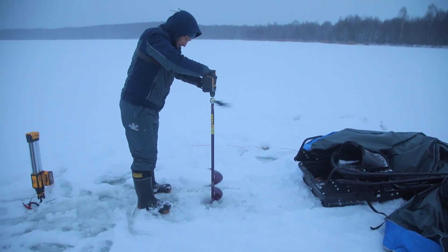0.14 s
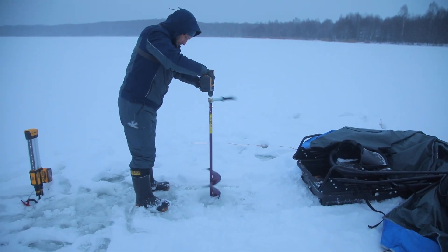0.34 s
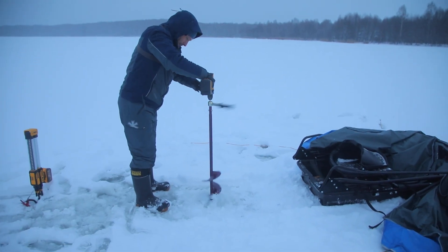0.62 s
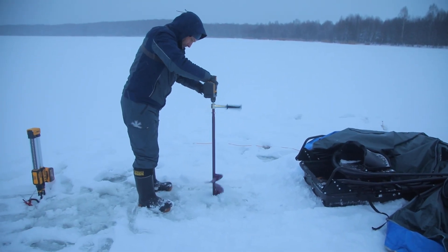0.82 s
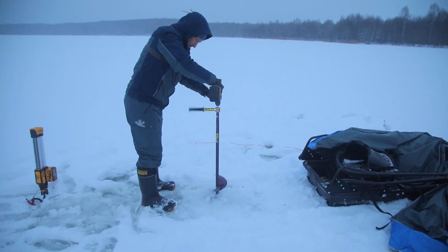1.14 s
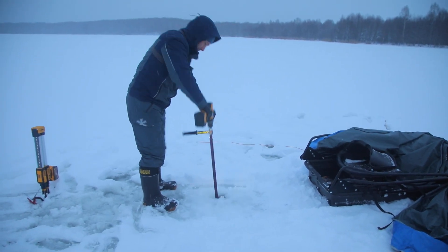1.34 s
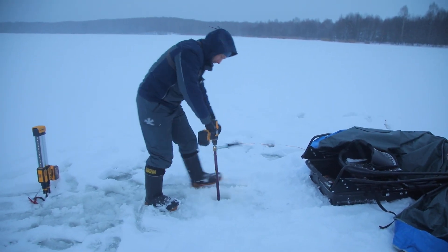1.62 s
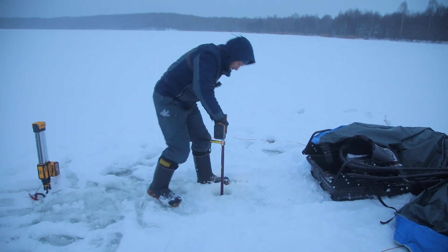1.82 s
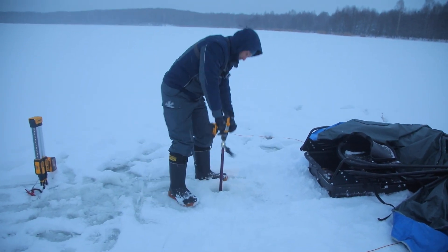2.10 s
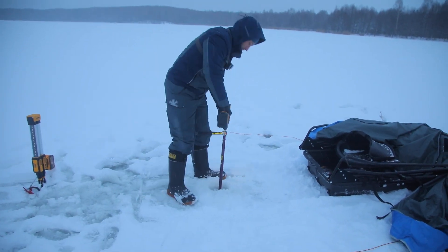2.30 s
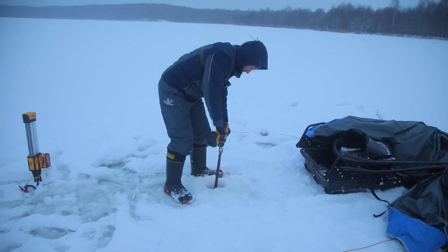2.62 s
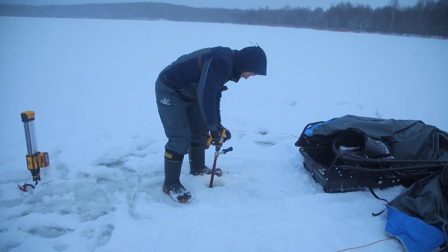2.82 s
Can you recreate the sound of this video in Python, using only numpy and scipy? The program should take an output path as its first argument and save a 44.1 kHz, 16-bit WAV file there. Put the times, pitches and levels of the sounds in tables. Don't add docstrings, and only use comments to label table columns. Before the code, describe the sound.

Cordless drill grinding an ice auger through lake ice, breaking through, then glugging, scraping pump strokes

```python
import sys
import numpy as np
from scipy import signal
from scipy.io import wavfile

SR = 44100
rng = np.random.default_rng(int(sys.argv[2]) if len(sys.argv) > 2 else 0)


def natural_amplitude(level_db):
    exponent = np.asarray(level_db, float) / 20
    return 10 ** exponent


def pcm_store(signal):
    levels = np.round(np.clip(np.atleast_2d(signal), -1, 1) * 32767)
    wavfile.write(sys.argv[1], SR, levels.astype(np.int16).T)


N = 130095

# (time [s], level [dB])
GRIND = [(0, -18.5), (.1, -15), (.54, -14), (.57, -17), (.8, -14.5), (1.1, -14.5), (1.3, -17),
         (1.31, -17.5), (1.36, -27), (1.4, -26), (1.46, -27), (1.6, -34), (1.66, -82)]
# (frequency [Hz], width [Hz], level [dB])
HOLE_MODES = [(220, 245, -5.5), (554, 182, 0.5), (974, 234, -3), (1434, 52, -8)]
# (frequency [Hz], width [Hz], level [dB])
SHAFT_MODES = [(352.5, 22, 0)]
# (frequency [Hz], width [Hz], level [dB])
DEEP_MODES = [(657.5, 143, 0.31), (833, 99, -0.22)]
DEEPEN_DB, DEEPEST_S = 3, 0.8
CHIPS_PER_S, CHIP_SPREAD_DB, BITES_PER_S, BITE_DB = 4000, 0.98, 22, -1
RUMBLE_DB = -26.5
LOAD_ENDS_S = 1.305

# (time [s], level [dB], mid brightness [dB])
MOTOR_LOAD = [(0, -15.5, -3), (.37, -16, -1.5), (.525, -15, -2.5), (.545, -20.5, -3), (.63, -18, -1),
              (1.285, -16, -2), (1.31, -26, 1.5), (1.36, -25.5, -4), (1.47, -24, 1), (1.53, -22, -3.5),
              (1.575, -39.5, 8), (1.6, -46, -3), (1.612, -35, -3)]
# (frequency [Hz], width [Hz], level [dB])
HOUSING_MODES = [(1920, 900, -12.4), (3010, 570, -14.5), (3720, 480, -10.5), (4440, 515, -12.5),
                 (5655, 840, -14), (8335, 970, -5.4), (12940, 3800, -8.5), (15600, 1870, -6.5)]
# (time [s], frequency [Hz], level [dB])
GEAR_MESH = [(.31, 1880, -60), (.335, 1940, -23), (.39, 2130, -24), (.45, 2200, -29), (.6, 2190, -29),
             (.9, 2180, -29), (1.29, 2190, -30), (1.305, 2190, -80)]
# (time [s], mesh frequency [Hz], octave level [dB])
GEAR_OCTAVE = [(0, 1890, -21), (.045, 1720, -23), (.07, 1740, -42), (.13, 1885, -23), (.23, 1875, -22),
               (.31, 1810, -24), (.33, 1870, -19), (.372, 2050, -18), (.385, 2060, -40), (.42, 2060, -30),
               (.46, 2090, -25), (.6, 2160, -36), (1.29, 2170, -36), (1.31, 2170, -95)]
# (time [s], frequency [Hz], level [dB])
SPIN_FREE = [(1.33, 5580, -95), (1.35, 5590, -30), (1.385, 5590, -30), (1.41, 5600, -40), (1.44, 5600, -29),
             (1.5, 5620, -28), (1.54, 5620, -95)]
WHINE_WOBBLE, WHINE_FLICKER_DB = 0.004, 2.2
FREE_DROP_DB = -5

# (frequency [Hz], level [dB])
AIR_COLOUR = [(71, -34), (130, 7), (473, -8.5), (1430, -11.5), (7980, -17), (14400, -11), (16000, -17)]
AIR_DB, WIND_DB, WIND_DB_PER_S = -47.5, -38.5, -9

# (time [s], peak level [dB], frequency [Hz])
ICE_LUMPS = [(0.091, -9, 820), (0.115, -8, 890), (0.174, -11.5, 980), (0.215, -7.5, 894), (0.329, -14, 640),
             (0.407, -18, 855), (0.482, -1.5, 813), (0.536, -6.5, 836), (0.549, -13, 813),
             (0.613, -5.5, 614), (0.679, -2, 808), (0.7, -9.5, 840), (0.74, -5.5, 810), (0.778, -8, 846),
             (0.823, -5, 840), (0.881, -6, 834), (0.926, -6.5, 683), (0.952, -17, 900), (1.08, -4.5, 640),
             (1.144, -16, 660), (1.173, -12, 670), (1.327, -15, 748), (1.371, -22, 860),
             (1.384, -13.5, 710), (1.393, -8.5, 690), (1.407, -16, 1020), (1.419, -12, 900),
             (1.444, -24, 745), (1.527, -21.5, 781)]
LUMP_DB, LUMP_T60_S, LUMP_GRIT = -2, 0.05, 0.55

# (start [s], length [s], start frequency [Hz], end frequency [Hz], peak level [dB])
SLIDES = [(.24, .11, 387.3, 376, -16), (.42, 0.036, 373, 358, -16), (.62, 0.038, 381, 373, -17.5),
          (.78, 0.066, 821, 888, -10.5), (.97, 0.036, 440, 417, -13.5), (1.155, 0.064, 383, 350, -12),
          (1.21, 0.11, 376, 393, -19.5), (1.27, 0.05, 845, 630, -13), (2.57, 0.075, 140, 170, -21.5),
          (2.62, 0.086, 369.5, 466, -15), (2.67, 0.061, 198, 202, -27), (2.69, 0.052, 496, 406, -26.5),
          (2.7, 0.068, 259, 277, -29)]

# (time [s], surge of water [dB],
# rasp of slush [dB])
PUMP_STROKES = [
    [(1.7, -51.5, -43.5), (1.72, -33.5, -34), (1.77, -39, -37), (1.79, -41, -32), (1.82, -36, -26.5),
     (1.835, -37, -39.5), (1.86, -40, -32), (1.928, -32, -38)],
    [(1.935, -14.5, -30.5), (2.0, -16.5, -31), (2.03, -17.5, -30.5), (2.06, -45, -36.5), (2.1, -34, -40.5),
     (2.15, -53, -46)],
    [(2.19, -36, -40), (2.24, -33, -37.5), (2.255, -22.5, -27.5), (2.29, -19, -30.5), (2.31, -36, -30.5),
     (2.35, -36, -39), (2.39, -50, -49), (2.44, -58, -47)],
    [(2.47, -46, -44.5), (2.53, -29.5, -36.5), (2.58, -21.5, -28), (2.62, -20, -31.5), (2.67, -21, -28.5),
     (2.7, -18.5, -33), (2.725, -36, -47.5), (2.77, -56, -48), (2.8, -65, -71)],
    [(2.83, -47.5, -43.5), (2.95, -53, -85)],
]
# (frequency [Hz], level [dB])
SURGE_COLOUR = [(71, -43), (120, -23), (173, 2.5), (343, 0.5), (530, -0.5), (1600, -18), (2080, -62),
                (3520, -120)]
# (frequency [Hz], level [dB])
SLUSH_COLOUR = [(820, 9.5), (1400, 3.5), (1750, -3), (2920, 0.5), (3760, -5), (5010, -5.5), (14700, -8),
                (16000, -15)]
BUBBLES_PER_S, BUBBLE_CYCLES = 1000, 11

# (time [s], peak level [dB], ring frequency [Hz], hollow part [dB], bright crack [dB])
SHAFT_TICKS = [(1.58, -10.5, 3650, -19.5, -7), (1.5944, -18, 6160, -27, -9), (1.7273, -30, 3570, -4, -8),
               (1.843, -28, 3800, 2.5, -2), (1.8865, -19.5, 3760, -2, -26), (1.9035, -18, 6020, -11, -12),
               (2.037, -18, 3840, -33, -14), (2.045, -19, 2620, -35, -4.5), (2.17, -17.5, 3760, -6.5, -17),
               (2.2067, -19.5, 4480, -15, -5), (2.304, -17.5, 4470, -20, -5),
               (2.3094, -13, 3620, -17, -5.5), (2.4228, -26, 6100, -15, -9), (2.4643, -15, 3700, -7.5, -16),
               (2.5024, -22, 3420, -8.5, -2.5), (1.611, -31, 2760, -24, -10), (1.689, -34, 4500, -23, -5),
               (1.745, -34, 5000, -17, -6), (2.748, -34, 4320, -25, -20), (2.771, -41, 4500, -20, -19),
               (2.887, -45, 3000, 1, -15)]
HOLLOW_MODES = (770, 1033, 1285)
RING_T60_S, CRACK_T60_S, HOLLOW_T60_S = 0.02, 0.022, 0.031
CRACK_DB, HOLLOW_HZ = 2.5, 1000

# (time [s], peak level [dB], frequency [Hz])
AIR_POCKETS = [(1.607, -27.5, 265), (1.713, -27.5, 290), (1.932, -9, 271), (1.95, -33, 413),
               (1.979, -2.5, 564), (2.018, -10, 426), (2.26, -12, 380), (2.28, -22.5, 167),
               (2.352, -35, 238), (2.585, -15, 550), (2.594, -3.5, 493)]
GLUG_CYCLES, GLUG_RISE = 5.06, 0.057


def rms_one(x):
    return x / np.sqrt(np.mean(x ** 2) + 1e-20)


def in_time(rows):
    s, *columns = np.transpose(rows)
    return [np.interp(np.arange(N) / SR, s, column) for column in columns]


def at_hz(points, hz):
    point_hz, db = np.transpose(points)
    return np.interp(np.log(hz), np.log(point_hz), db)


def drift(rate):
    r = np.exp(-80 * np.pi * rate / SR)
    draws = rng.standard_normal(N // 40 + 2002)
    slow = signal.lfilter([1], [1, -2 * r, r * r], draws)[2000:]
    return np.interp(np.arange(N) / 40, np.arange(len(slow)), rms_one(slow))


def band(x, low_hz, high_hz):
    edges = [low_hz, min(high_hz, 0.45 * SR)]
    return signal.sosfilt(signal.butter(2, edges, "band", fs=SR, output="sos"), x)


def grains(per_s, spread_db):
    size = natural_amplitude(spread_db * np.minimum(rng.exponential(1, N), 5)) * rng.choice([-1, 1], N)
    return size * (rng.random(N) < per_s / SR) + 1e-18


def body(x, modes, patchy_db):
    out = 0
    for k, (hz, width, db) in enumerate(modes):
        r = np.exp(-np.pi * width / SR)
        poles = [1, -2 * r * np.cos(2 * np.pi * hz / SR), r * r]
        ring = signal.lfilter([(1 - r * r) / 2, 0, (r * r - 1) / 2], poles, x)
        out = out + (-1) ** k * natural_amplitude(db + patchy_db * drift(9.2)) * ring
    return rms_one(out)


def coloured(pair, spectrum, patchy_db):
    edges = 25 * 2 ** np.arange(0, 9.5, 1 / 3)
    lowest, highest = spectrum[0][0] * 0.8, spectrum[-1][0]
    inside = [(a, b) for a, b in zip(edges, edges[1:]) if lowest < a < highest]
    out = 0
    for k, (a, b) in enumerate(inside):
        db = at_hz(spectrum, np.sqrt(a * b)) + patchy_db * drift(37.0)
        out = out + natural_amplitude(db) * band(pair[k % 2], a, b)
    return rms_one(out)


def add(out, s, sound):
    i = int(s * SR)
    out[i:i + len(sound)] += sound[:N - i]


def blades():
    [grind_db] = in_time(GRIND + [(1.7, -90)])
    t = np.arange(N) / SR
    bite_hz = BITES_PER_S * (1 + 0.24 * drift(2.6))
    bite_db = BITE_DB * np.sin(2 * np.pi * np.cumsum(bite_hz) / SR)
    chips = grains(CHIPS_PER_S, CHIP_SPREAD_DB) * natural_amplitude(bite_db + 0.15 * drift(43.0))
    hole = natural_amplitude(-1.5) * body(chips, HOLE_MODES, patchy_db=1.5)
    still_shallow = np.clip(1 - t / DEEPEST_S, 0, 1)
    deep = natural_amplitude(-1.0 - DEEPEN_DB * still_shallow) * body(chips, DEEP_MODES, patchy_db=1.0)
    shaft = natural_amplitude(-13.0) * body(chips * (t < LOAD_ENDS_S), SHAFT_MODES, patchy_db=4.5)
    rumble = natural_amplitude(RUMBLE_DB) * rms_one(band(rng.standard_normal(N), 43, 210))
    return natural_amplitude(grind_db) * (band(hole + deep + shaft, 144, 3400) + rumble)


def motor():
    db, mid_db = in_time(MOTOR_LOAD + [(1.64, -86, 0.0078)])
    hiss = (rng.standard_normal(N) + 1.15 * grains(1600, 2.5)) * natural_amplitude(0.84 * drift(31.0))
    off_load = np.arange(N) / SR > LOAD_ENDS_S
    low = natural_amplitude(-4.0 + FREE_DROP_DB * off_load) * body(hiss, HOUSING_MODES[:1], patchy_db=-0.2)
    mid = -0.86 * body(hiss, HOUSING_MODES[1:5], patchy_db=1.3)
    out = natural_amplitude(db + mid_db) * band(low + mid + 0.5 * rng.standard_normal(N), 880, 8200)
    out += natural_amplitude(db + 3.0) * band(body(hiss, HOUSING_MODES[5:], patchy_db=-0.2), 9330, 21000)
    mesh_hz, octave_db = in_time(GEAR_OCTAVE)
    for hz, level_db in (in_time(GEAR_MESH), (2 * mesh_hz, octave_db), in_time(SPIN_FREE)):
        level = natural_amplitude(level_db + WHINE_FLICKER_DB * drift(24.0))
        wobbly_hz = hz * (1 + WHINE_WOBBLE * drift(54.0))
        out += level * np.sin(2 * np.pi * np.cumsum(wobbly_hz) / SR)
    return out


def air():
    wind_db = WIND_DB + WIND_DB_PER_S * np.arange(N) / SR + 1.7 * drift(2.7)
    wind = natural_amplitude(wind_db) * rms_one(band(rng.standard_normal(N), 50, 123))
    return natural_amplitude(AIR_DB) * coloured(rng.standard_normal((2, N)), AIR_COLOUR, patchy_db=0.4) + wind


def crunches():
    out, t = np.zeros(N), np.arange(SR // 20) / SR
    noise = rng.standard_normal((len(ICE_LUMPS), len(t)))
    for (s, db, hz), grit in zip(ICE_LUMPS, noise):
        ring = np.sin(2 * np.pi * hz * t) + LUMP_GRIT * rms_one(band(grit, hz * 0.56, hz * 2.03))
        attack = np.minimum(t / 0.00088, 1)
        add(out, s, natural_amplitude(db + LUMP_DB - 60 * t / LUMP_T60_S) * attack * ring)
    return out


def notes():
    out = np.zeros(N)
    for s, length, from_hz, to_hz, db in SLIDES:
        part = np.arange(int(length * SR)) / (length * SR)
        hz = from_hz + (to_hz - from_hz) * part
        swell = np.sin(np.pi * part) ** 0.73
        add(out, s, natural_amplitude(db) * swell * np.sin(2 * np.pi * np.cumsum(hz) / SR))
    return out * natural_amplitude(0.83 * drift(48.0))


def pumping():
    rows = [row for stroke in PUMP_STROKES for row in stroke]
    surge_db, rasp_db = in_time([(1.57, -73, -90), (1.62, -36, -47)] + rows)
    born = grains(BUBBLES_PER_S, 2.1)
    size = rng.integers(0, 16, N)
    bubbles = 0
    for k, hz in enumerate(np.geomspace(130, 1400, num=16)):
        width = np.log(1000) / np.pi * hz / BUBBLE_CYCLES
        push = band(born * (size == k) + 1e-18, hz / 1.93, hz * 1.58)
        ring = body(push, [(hz, width, 0)], patchy_db=0.5)
        bubbles = bubbles + natural_amplitude(at_hz(SURGE_COLOUR, hz)) * np.sqrt(hz) * ring
    surge = natural_amplitude(surge_db - 1.0) * rms_one(band(bubbles, 118, 780))
    crystals = np.array([grains(2900, 2.0), grains(2500, 2.3)])
    slush = rng.standard_normal((2, N)) + 0.17 * crystals
    rasp = coloured(slush, SLUSH_COLOUR, patchy_db=2.1)
    rasp = rasp + 0.3 * body(slush[0], HOUSING_MODES[2:3], patchy_db=2.0)
    return surge + natural_amplitude(rasp_db - 4.0 + 3.2 * drift(120.0)) * rasp


def ticks():
    out, t = np.zeros(N), np.arange(SR // 20) / SR
    noise = rng.standard_normal((len(SHAFT_TICKS), 3, len(t)))
    attack = np.minimum(t / 0.00086, 1)
    for (s, db, hz, hollow_db, crack_db), (a, b, c) in zip(SHAFT_TICKS, noise):
        crack = natural_amplitude(crack_db + CRACK_DB - 60 * t / CRACK_T60_S) * rms_one(band(a, 7200, 20000))
        ring = np.sin(2 * np.pi * hz * t) + 0.7 * rms_one(band(b, hz * 0.75, hz * 1.22))
        ring = natural_amplitude(-4.5 - 60 * t / RING_T60_S) * ring
        knock = 0.89 * sum(np.sin(2 * np.pi * f * t) for f in HOLLOW_MODES)
        knock = knock + 1.84 * rms_one(band(c, HOLLOW_HZ * 0.18, HOLLOW_HZ * 1.08))
        hollow = natural_amplitude(hollow_db - 60 * t / HOLLOW_T60_S) * knock
        add(out, s, natural_amplitude(db) * attack * (crack + ring + hollow))
    return out


def glugs():
    out = np.zeros(N)
    for s, db, hz in AIR_POCKETS:
        part = np.arange(int(GLUG_CYCLES * SR / hz)) * hz / SR / GLUG_CYCLES
        swell = np.sin(np.pi * part ** 0.5) ** 1.6
        cycles = GLUG_CYCLES * part * (1 + GLUG_RISE * part)
        add(out, s, natural_amplitude(db) * swell * np.sin(2 * np.pi * cycles))
    return out


def scene():
    drilling = blades() + motor() + air() + crunches() + notes()
    mono = drilling + pumping() + ticks() + glugs()
    return np.array([mono, mono])


def band_limit(x):
    return signal.sosfilt(signal.butter(12, 16790, fs=SR, output="sos"), x)


def record(dry):
    rounded = 1.1 * np.tanh(dry / 1.1)
    top_cut = signal.ellip(14, 0.3, 80, 15850, fs=SR, output="sos")
    mix = signal.sosfilt(top_cut, rounded)
    return band_limit(mix)


dry = scene()
out = record(dry)
pcm_store(out)
```